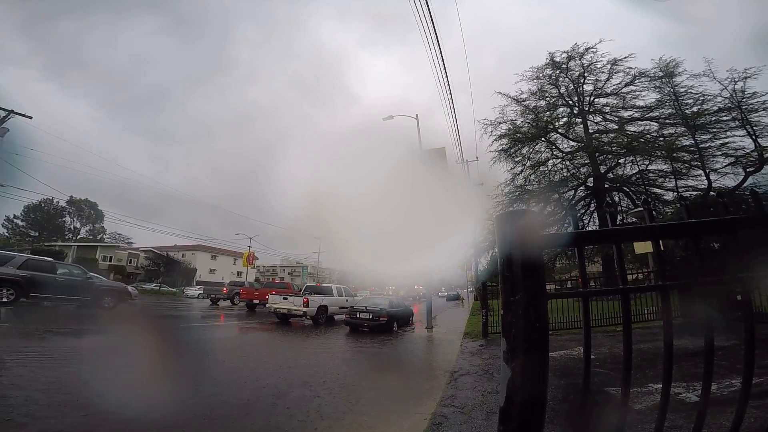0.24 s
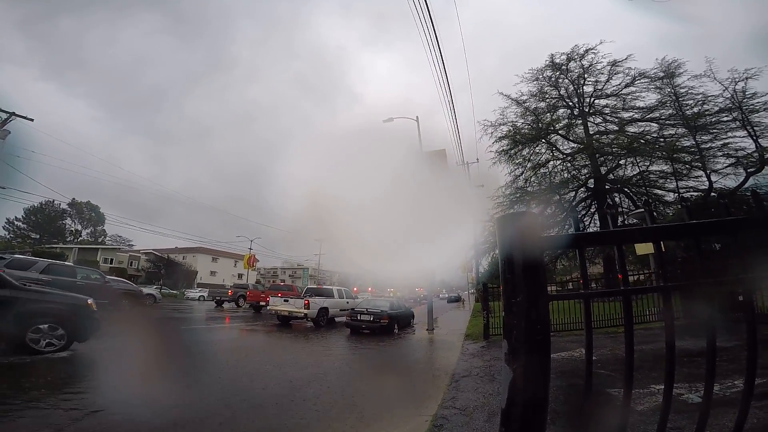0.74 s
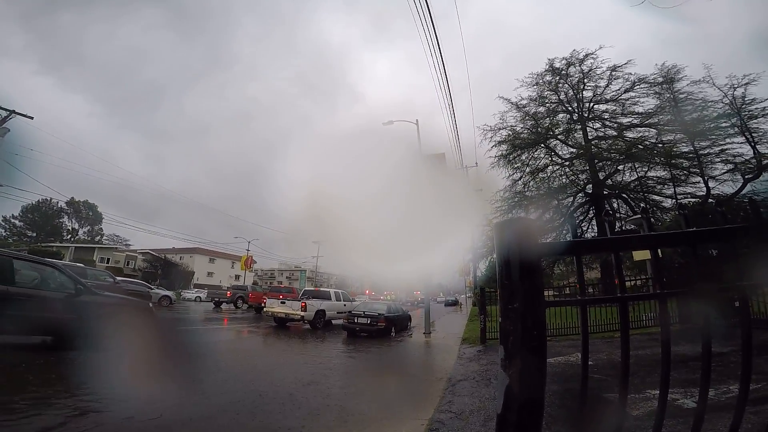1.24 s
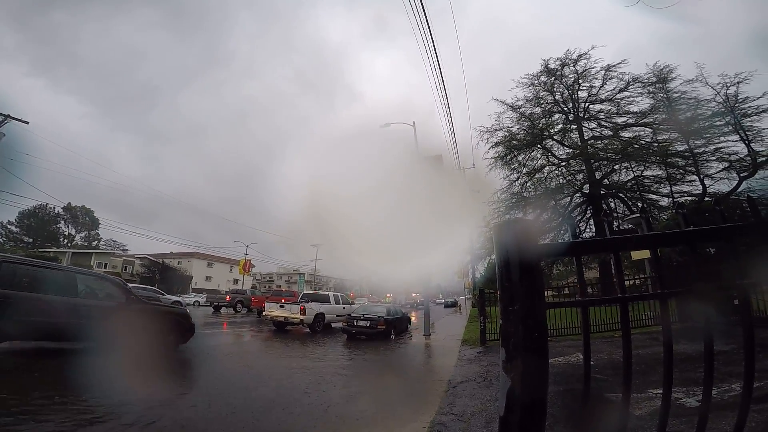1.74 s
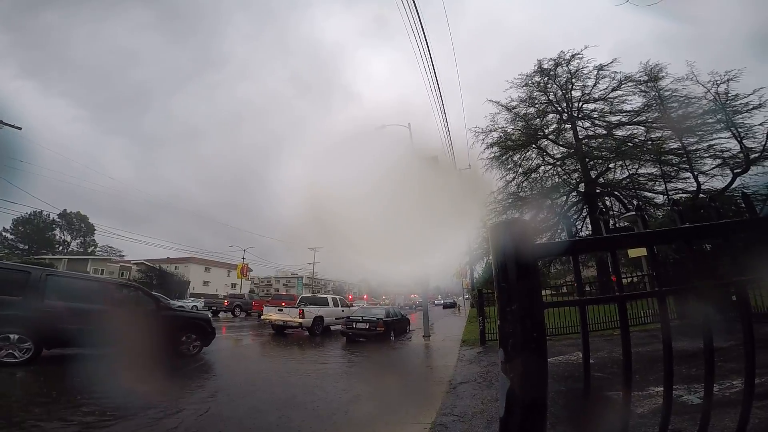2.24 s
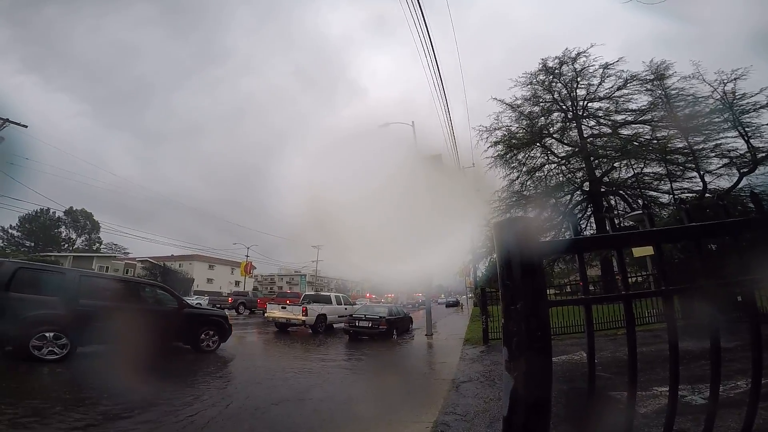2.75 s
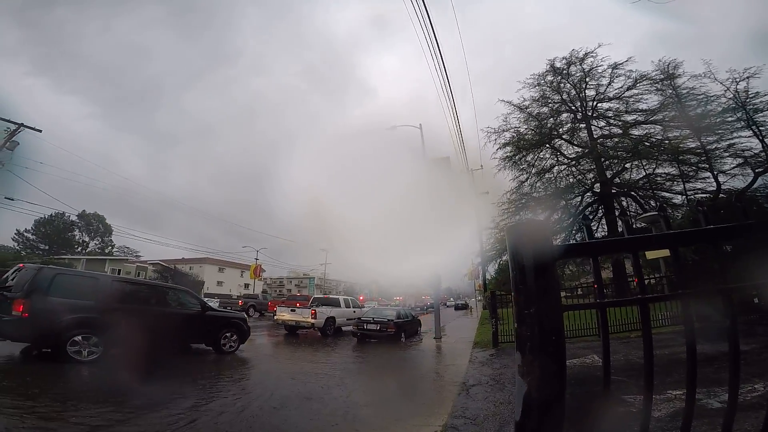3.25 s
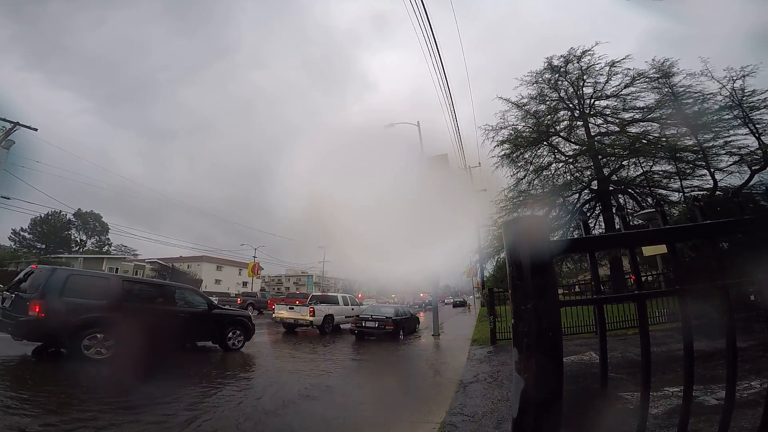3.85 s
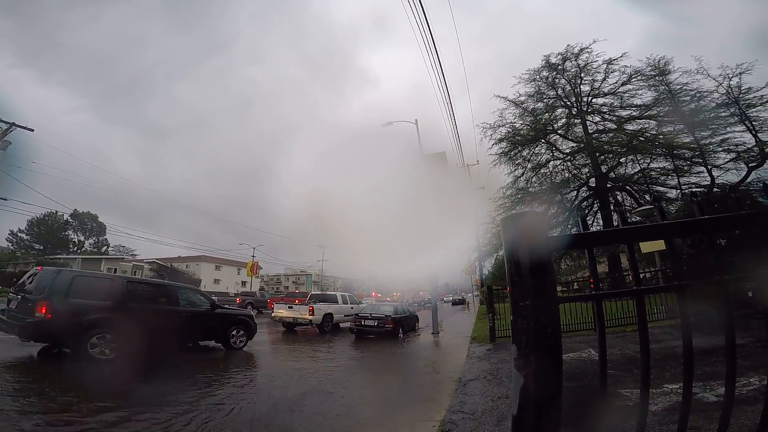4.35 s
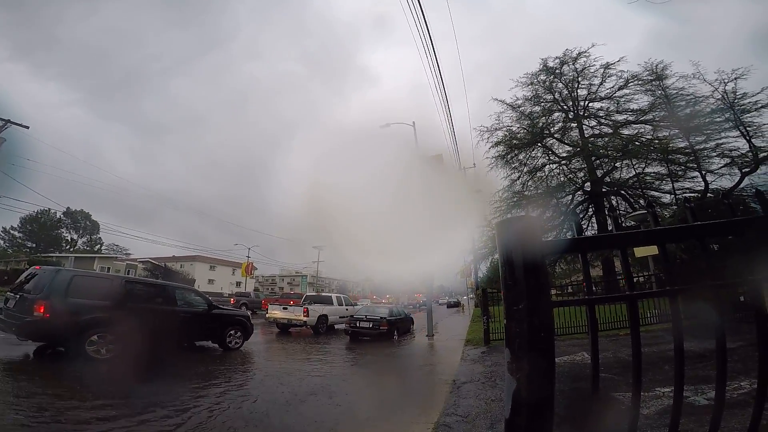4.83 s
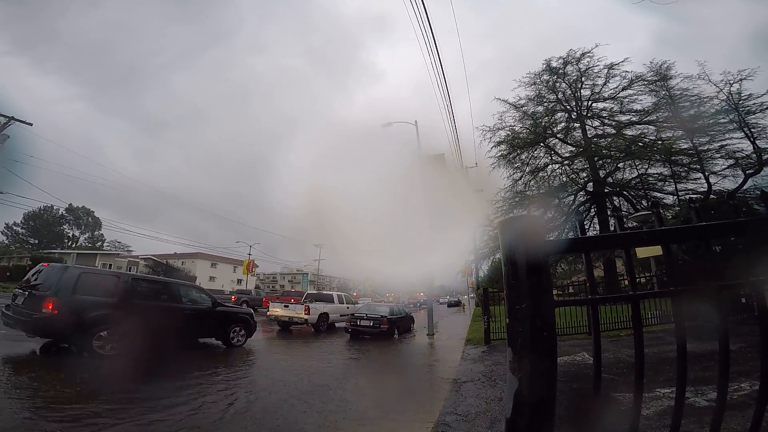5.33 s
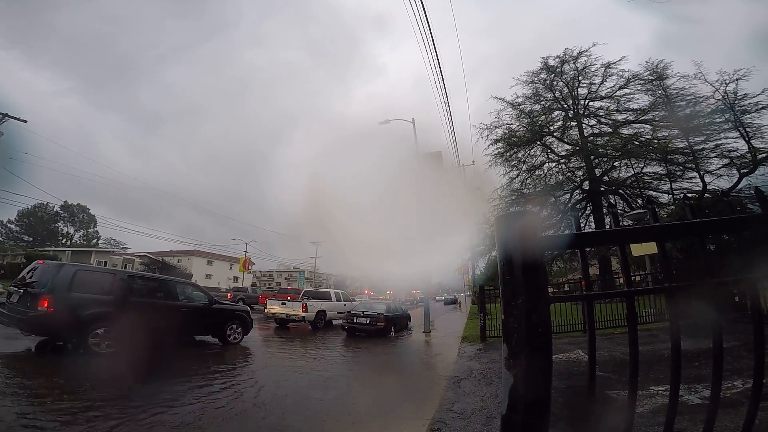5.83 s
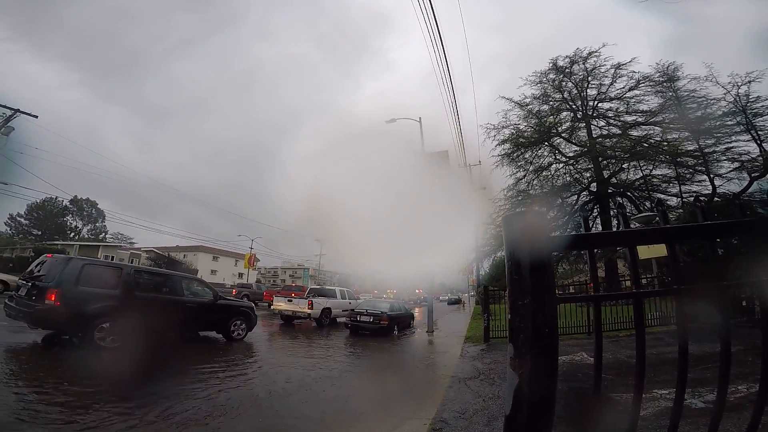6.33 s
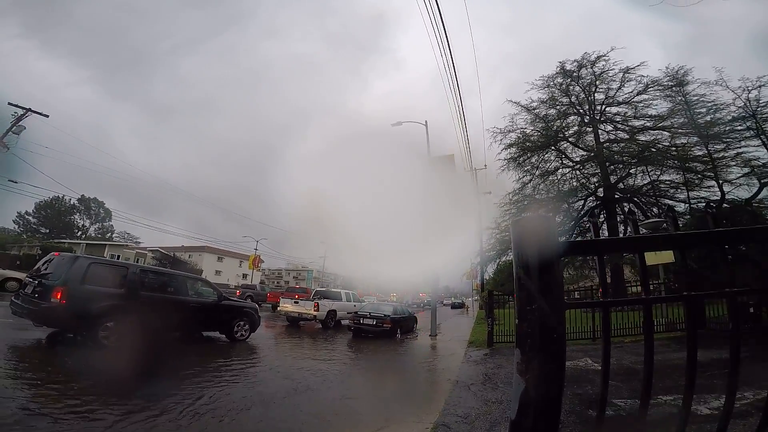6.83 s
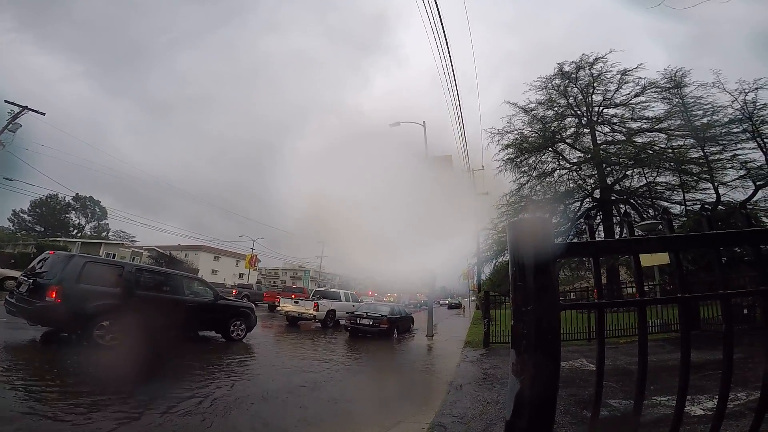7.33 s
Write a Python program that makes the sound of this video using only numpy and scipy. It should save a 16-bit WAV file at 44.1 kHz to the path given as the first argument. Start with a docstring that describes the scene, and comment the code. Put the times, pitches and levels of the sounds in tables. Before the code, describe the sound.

Heavy raindrops tick and knock on a camera case while tyres hiss through a flooded street, engines idle and gusts rumble low.

```python
"""Heavy rain at a flooded crossing, heard from inside a waterproof case; about 7.6 s.
From the start: tyre wash and street rain (noise and splashes), a near engine that sinks in pitch and level,
two idling engines (sine pairs), and breeze (low noise). Drops soon tick on the case (ringing modes, sprays).
Gusts swell the low rumble from 1.1 s, strongest at 3.6 to 6.3 s; small drops fall thickest at 3.8 to 5.6 s.
Hard drops strike at 0.05 s, in a close pair at 5.2 s, and again at 6.9 and 7.0 s."""
import sys
import numpy as np
from scipy import signal
from scipy.fft import rfft, irfft, next_fast_len
from scipy.io import wavfile
from scipy.ndimage import uniform_filter1d

SR = 44100
rng = np.random.default_rng(int(sys.argv[2]) if len(sys.argv) > 2 else 0)


def file_out(sig):
    """Save sig as 16-bit WAV at sys.argv[1]."""
    # one column per channel
    cols = np.atleast_2d(sig).T
    # limit, then scale
    lim = np.clip(cols, -1, 1)
    pcm = np.round(lim * 32767).astype(np.int16)
    wavfile.write(sys.argv[1], SR, pcm)


N = 334278
TIME = np.arange(N) / SR
TOP_HZ = 15400  # upper limit of the sound

# tyres in the water and rain on the street, mean course: t/s, level/dB
WASH_LEVEL = [(0.0, -36), (0.55, -39), (1.5, -36), (1.79, -39.5), (2.95, -41.5), (4.14, -41.5), (4.5, -43),
              (5.28, -42), (5.47, -43), (6.21, -45), (7.58, -43.5)]
# spectrum of that water, relative: f/Hz, level/dB
WASH_SPECTRUM = [(300, -5.5), (700, -8.5), (900, -1.5), (1300, -5), (1900, -1.5), (2250, -0.5),
                 (2800, -5.5), (3800, -7.5), (5000, -11.5), (6500, -17), (7800, -19), (9200, -23.5),
                 (11500, -24.5), (13500, -22), (15500, -26)]
# spectrum of the road rumble, relative: f/Hz, level/dB
ROAD_SPECTRUM = [(20, -3), (40, 1), (100, -4), (160, -10), (260, -38), (400, -13.5), (560, -26),
                 (720, -29.5), (920, -24.5), (1200, -30.5), (2000, -31), (4000, -56)]
# near engine slowing down, mean course: t/s, firing rate f/Hz, level/dB
NEAR_ENGINE = [(0, 82, -33.5), (.4, 73.6, -39.5), (.8, 72, -45), (1.3, 70, -50), (2.2, 65.3, -47),
               (7.58, 62, -54)]
# idling engines in the queue, mean: firing rate f/Hz, level/dB
IDLING_ENGINES = [(57, -40.5), (103, -41.5)]
# spectrum of large eddies buffeting the case, relative: f/Hz, level/dB
BUFFET_SPECTRUM = [(8.8, -37), (15, 4), (32, 3), (51, 4.5), (102, -6.5), (140, -12.5), (200, -19.5),
                   (260, -77), (440, -120)]
# spectrum of small eddies fluttering on the case, relative: f/Hz, level/dB
FLUTTER_SPECTRUM = [(90, -10.5), (160, -1), (230, -2), (300, -4.5), (400, -5.5), (470, -13.5), (560, -28),
                    (750, -28.5), (1200, -53)]
# buffeting by the breeze between gusts, before churn: t/s, level/dB
BREEZE_LEVEL = [(0, -28), (1.3, -27), (1.5, -32), (2.3, -25), (3.7, -24), (4.25, -27), (5.4, -23),
                (7.58, -24)]
# gusts, before churn: crest t/s, rise to the crest from 1/e t/s, buffeting level/dB, flutter level/dB
GUST_CRESTS = [(1.136, 0.045, -21.5, -48.5), (2.63, 0.098, -20, -33), (2.885, .05, -20.5, -35.5),
               (3.38, 0.17, -15, -36), (3.573, 0.097, -11, -21.5), (3.846, 0.061, -16.5, -28),
               (4.003, 0.048, -14.5, -33), (4.831, .12, -14.5, -32), (5.087, 0.0515, -16.5, -36),
               (5.623, 0.073, -11, -29), (5.823, 0.049, -13, -27.5), (6.13, 0.063, -11.5, -25.5),
               (6.29, 0.048, -9, -21), (6.48, 0.089, -20, -36), (7.258, 0.045, -18, -40),
               (7.45, 0.054, -18.5, -25.5)]
# small drops on the case, mean rate for each layer that uses it: t/s, rate/(drops per s)
PATTER_RATE = [(0, 20), (1.2, 45), (2.1, 8), (3.3, 14), (3.8, 75), (4.4, 50), (5.15, 65), (5.6, 14),
               (6.1, 34), (7.58, 8)]
# modes of the case, average blow: f/Hz, relative level/dB, 60 dB decay t/s
CASE_MODES = [(505, -17.5, 0.0042), (805, -15.5, 0.0044), (1006, -6, 0.005), (1210, -3.5, 0.0059),
              (1997, 2.5, 0.0076), (2515, -1, 0.0083), (3044, -1.5, 0.0092), (4100, -1, 0.0066),
              (5150, -3, 0.0089), (6490, -2.5, 0.0048), (7860, -5.5, 0.0054), (10200, -9, 0.0023),
              (13000, -26, 0.0017)]
# heavy drops on the case: t/s, 10 ms rms level/dB before gain and balance, brightness/(dB per octave)
HEAVY_DROPS = [(0.049, -17, 0.5), (0.0844, -39, 4.5), (0.2714, -24.5, -1), (0.2813, -35, 3),
               (0.7306, -36.5, -1), (0.848, -37.5, -3), (1.0088, -30.5, -6), (1.2913, -25.5, -4),
               (1.3302, -33.5, -2.5), (1.5655, -23.5, 9), (1.9804, -35, 3.5), (2.4304, -31.5, -0.5),
               (3.432, -35, -0.5), (3.7393, -43, 7.5), (3.8096, -40, 1), (3.8868, -40.5, -0.5),
               (3.9195, -40.5, 3.5), (4.1785, -46, 6.5), (4.2212, -31, -6), (4.283, -38.5, 3),
               (4.3075, -37, 3), (4.5237, -41, -1), (4.545, -39.5, 2.5), (4.5887, -37, -7.5),
               (4.6262, -36.5, 4.5), (4.649, -39.5, -5.5), (4.7486, -31, 4), (5.066, -35.5, -2.5),
               (5.117, -38.5, 3), (5.1236, -36.5, -4.5), (5.1365, -40, 2), (5.1628, -40.5, 0.5),
               (5.2234, -19.5, 2), (5.2321, -33, -4), (5.2467, -15, -0.5), (5.2824, -38.5, -0.5),
               (5.3328, -39, -0.5), (5.9937, -42, 2), (6.035, -38.5, -1), (6.053, -43.5, 2.5),
               (6.1562, -42, 0.5), (6.4787, -39.5, -3), (6.559, -39.5, 1), (6.6127, -37, -1.5),
               (6.728, -35, -2), (6.8536, -25, 4), (7.011, -35.5, 1.5)]
# ranges of thud, ring, tick and spray: low f/Hz, high f/Hz
RANGES_HZ = [(450, 1400), (1400, 2700), (2700, 6000), (6000, 15000)]
# strength of thud, ring, tick and spray in a drop of usual level and even brightness: level/dB
RANGE_BALANCE_DB = [-1.5, -0.5, -3, -16]
# drops that set one part of the case or its mount ringing: t/s, f/Hz, starting peak level/dB, 1/e decay t/s
CASE_KNOCKS = [(0.0499, 2050, -4.5, 0.0017), (1.291, 464, -18.5, 0.0032), (1.5656, 4470, -8.5, 0.0013),
               (1.573, 2400, -8, 0.0015), (1.9805, 5200, -16, .0012), (2.43, 4700, -19.5, 0.0014),
               (2.4306, 1610, -16.5, 0.0024), (3.743, 420, -15.5, 0.0028), (5.2234, 3210, -6, 0.0021),
               (5.2472, 1980, -6.5, 0.0026), (6.8538, 795, -5, 0.00098), (7.011, 238, -10.5, 0.0026),
               (7.011, 3130, -15.5, 0.00088)]
# drops that burst: t/s, f/Hz near the top of the burst's own band, starting rms level/dB, 1/e decay t/s
DROP_BURSTS = [(1.238, 11300, -27.5, 0.0018), (1.254, 10660, -38, 0.0107), (3.203, 11040, -39, 0.0035),
               (3.373, 8500, -38, .003), (3.92, 4200, -32, 0.014), (3.93, 10000, -39.5, 0.016),
               (4.75, 4700, -25, 0.014), (5.343, 5550, -28.5, 0.0022), (7.011, 10500, -20.5, 0.0016)]


def undb(db):
    """Decibels to gain."""
    return 10 ** (np.asarray(db) / 20)


def unit(x):
    """Scale to rms 1."""
    return x / np.sqrt(np.mean(x ** 2))


def curves(table):
    """The columns of a table of timed rows, joined by straight lines."""
    times_s, *columns = np.transpose(table)
    return [np.interp(TIME, times_s, column) for column in columns]


def walk(rate_hz):
    """Smooth random wander with an rms of 1: random steps, averaged twice."""
    step = int(SR / rate_hz)
    steps = np.repeat(rng.standard_normal(N // step + 1), step)
    smooth = uniform_filter1d(uniform_filter1d(steps, step), step)
    return unit(smooth[:N])


def colour(x, points):
    """Give x a spectrum of (f/Hz, level/dB) points, falling 12 dB per octave beyond the ends; rms 1."""
    hz, db = np.transpose(points)
    size = next_fast_len(N, True)
    f = np.maximum(np.fft.rfftfreq(size, 1 / SR), 1)
    gain = undb(np.interp(np.log(f), np.log(hz), db))
    gain = gain * np.minimum(f / hz[0], 1) ** 2 * np.minimum(hz[-1] / f, 1) ** 2
    return unit(irfft(rfft(x, size) * gain, size)[:N])


def shade(x, hz, db):
    """Minimum-phase tone colour through (f/Hz, level/dB) points, which keeps the attack sharp."""
    size = 2 * len(x)
    f = np.maximum(np.fft.rfftfreq(size, 1 / SR), 1)
    log_gain = np.log(undb(np.interp(np.log(f), np.log(hz), db)))
    cepstrum = irfft(log_gain)[:len(x)]
    cepstrum[1:] *= 2  # fold onto positive time: causal
    return irfft(rfft(x, size) * np.exp(rfft(cepstrum, size)))[:len(x)]


def band(x, low_hz, high_hz, order=3):
    """Causal band-pass."""
    edges = [low_hz, min(high_hz, SR / 2 - 1000)]
    return signal.sosfilt(signal.butter(order, edges, "bp", fs=SR, output="sos"), x)


def add(out, s, x):
    """Mix x into out at time s."""
    i = max(int(s * SR), 0)
    out[i:i + len(x)] += x[:max(N - i, 0)]


def wash(splashes_per_s=2500, grain_db=5.0, splash_db=-5, slosh_db=1.0):
    """Water thrown by tyres and rain on the flood: countless tiny splashes over a smooth far hiss."""
    level_db, = curves(WASH_LEVEL)
    sizes = undb(grain_db * np.minimum(rng.exponential(size=N), 5))
    hits = rng.random(N) < splashes_per_s / SR
    splashes = hits * sizes * rng.choice([-1, 1], N)
    water = rng.standard_normal(N) + undb(splash_db) * unit(splashes)
    return colour(water, WASH_SPECTRUM) * undb(level_db + slosh_db * walk(14))


def traffic(road_db=-34, overtone_db=-9, rough_db=3.5, waver=0.0116):
    """Road rumble, the near engine running down and the queue idling: wavering tones with one overtone."""
    out = undb(road_db) * colour(rng.standard_normal(N), ROAD_SPECTRUM)
    for hz, db in [curves(NEAR_ENGINE)] + IDLING_ENGINES:
        phase = 2 * np.pi * np.cumsum(hz * (1 + waver * walk(5))) / SR
        tone = np.sin(phase) + undb(overtone_db) * np.sin(2 * phase)
        out += np.sqrt(2) * undb(db + rough_db * walk(8)) * tone
    return out


def eddies(points, hold_s=0.0683):
    """Turbulent pressure: coloured noise whose strength stays even over longer stretches than hold_s."""
    x = colour(rng.standard_normal(N), points)
    return x / np.sqrt(uniform_filter1d(x ** 2, int(hold_s * SR)) + 1e-6)


def gust(peak_s, length_s, linger=1.14, roundness=1.3):
    """A swell from 0 to 1 and back that falls linger times more slowly than it rises."""
    age = (TIME - peak_s) / length_s
    distance = np.maximum(-age, age / linger).clip(0, 10)
    return np.exp(-distance ** roundness)  # roundness 1 = pointed crest, 2 = bell


def wind(breeze_flutter_db=-38, churn_db=2.23):
    """Large eddies buffet the case, small ones flutter on it; gusts add their power to a light breeze."""
    breeze_db, = curves(BREEZE_LEVEL)
    buffet_power = undb(breeze_db) ** 2
    flutter_power = undb(breeze_flutter_db) ** 2
    for s, length_s, buffet_db, flutter_db in GUST_CRESTS:
        swell = gust(s, length_s)
        buffet_power = buffet_power + (undb(buffet_db) * swell) ** 2
        flutter_power = flutter_power + (undb(flutter_db) * swell) ** 2
    churn = undb(churn_db * walk(35))
    buffet = np.sqrt(buffet_power) * eddies(BUFFET_SPECTRUM)
    flutter = np.sqrt(flutter_power) * eddies(FLUTTER_SPECTRUM)
    return churn * (buffet + flutter)


def landings(count=700):
    """Random small drops, thicker in flurries: (t/s, mass 0-1, speed 0-1)."""
    rate, = curves(PATTER_RATE)
    drops = []
    for place, chance, mass, speed in rng.random((count, 4)):
        if chance < rate[int(place * N)] * N / SR / count:
            drops.append((place * N / SR, mass, speed))
    return drops


def case_ring(size=1024, spot_db=2, detune=0.047, splash=0.58, splash_s=0.00082):
    """One blow on the case: where it lands decides how much each mode rings; the water splashes briefly."""
    t = np.arange(size) / SR
    hz, db, t60 = np.transpose(CASE_MODES)[:, :, None]
    spot, shift = rng.standard_normal((2, len(CASE_MODES), 1))
    side = np.resize([1, -1], (len(CASE_MODES), 1))  # neighbouring modes swing in opposite directions
    swing = np.sin(2 * np.pi * hz * (1 + detune * shift) * t)
    modes = side * undb(db + spot_db * spot - 60 * t / t60) * swing
    return modes.sum(axis=0) + splash * rng.standard_normal(size) * np.exp(-t / splash_s)


def patter(peak_db=-36.5, spread_db=11):
    """Small drops ring the case softly, the heavier the louder."""
    out = np.zeros(N)
    for s, mass, _ in landings():
        ring = case_ring()
        add(out, s, ring / np.abs(ring).max() * undb(peak_db + spread_db * mass ** 2))
    return out


def droplets(size=1024, peak_db=-42, spread_db=10, decay_s=0.00046, mist=0.33, mist_s=0.0096, lowest_hz=3000):
    """Droplets too light to ring the case: they spit, the faster the brighter, and scatter into mist."""
    out, t = np.zeros(N), np.arange(size) / SR
    envelope = np.exp(-t / decay_s) + mist * np.exp(-t / mist_s)
    for s, mass, speed in landings():
        spit = band(rng.standard_normal(size) * envelope, lowest_hz * (1 + speed), TOP_HZ, order=1)
        add(out, s, spit / np.abs(spit).max() * undb(peak_db + spread_db * mass ** 2))
    return out


def big_drops(gain_db=1.5, lowest_hz=560, pivot_hz=2030, thud_lag=0.32, usual_db=-27.5):
    """Fat slow drops thud, small fast ones tick: brightness tilts how a blow excites the case."""
    out = np.zeros(N)
    centres_hz = np.sqrt(np.prod(RANGES_HZ, axis=1))
    for s, level_db, brightness in HEAVY_DROPS:
        tilt_db = brightness * np.log2(centres_hz / pivot_hz)
        target_db = level_db + gain_db + np.array(RANGE_BALANCE_DB) + tilt_db
        target_db[0] -= thud_lag * (level_db - usual_db)  # the thud falls behind in harder blows
        ring = band(case_ring(), lowest_hz, TOP_HZ, order=2)
        # level of the ring in each range, as rms over 10 ms
        own_db = [10 * np.log10(np.sum(band(ring, *edges) ** 2) / (SR / 100)) for edges in RANGES_HZ]
        add(out, s, shade(ring, centres_hz, target_db - own_db))
    return out


def knocks(size=2048):
    """A square hit rings one part above the others: a brief decaying sine."""
    out, t = np.zeros(N), np.arange(size) / SR
    for s, hz, db, decay_s in CASE_KNOCKS:
        add(out, s, undb(db) * np.sin(2 * np.pi * hz * t) * np.exp(-t / decay_s))
    return out


def bursts(size=4096, grain_db=5):
    """A bursting drop showers the case with a dying spray of droplets: grainy band-passed noise."""
    out, t = np.zeros(N), np.arange(size) / SR
    for s, hz, db, decay_s in DROP_BURSTS:
        grains = rng.standard_normal(size) * undb(grain_db * rng.standard_normal(size))
        spray = unit(band(grains, hz / 1.42, hz * 1.08, order=2))
        add(out, s, spray * undb(db) * np.exp(-t / decay_s))
    return out


def scene():
    """Water, traffic, wind and rain at one microphone."""
    rain = patter() + droplets() + big_drops() + knocks() + bursts()
    return (wash() + traffic() + wind() + rain)[None]


def record(dry):
    """Peaks beyond full scale overload the input and clip; a steep low-pass then cuts the top."""
    low_pass = signal.ellip(8, .2, 70, TOP_HZ, fs=SR, output="sos")
    return signal.sosfilt(low_pass, np.clip(dry, -1, 1))


dry = scene()
out = record(dry)
file_out(out)
```